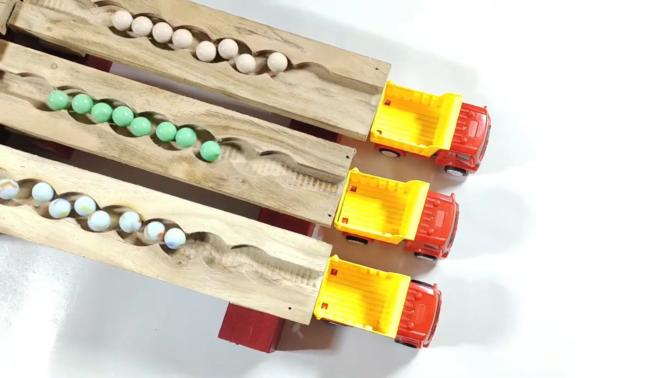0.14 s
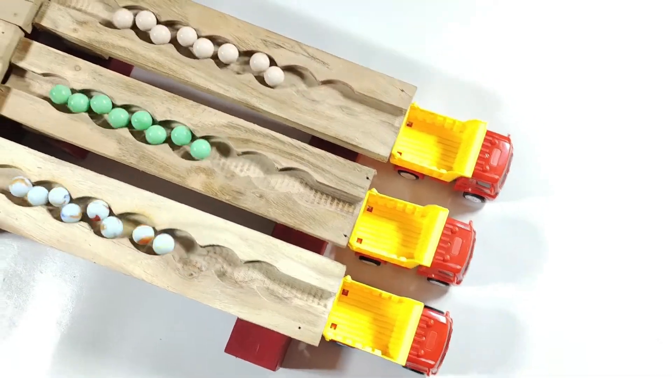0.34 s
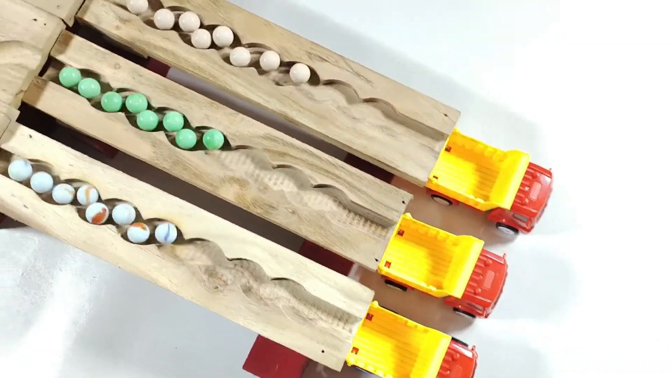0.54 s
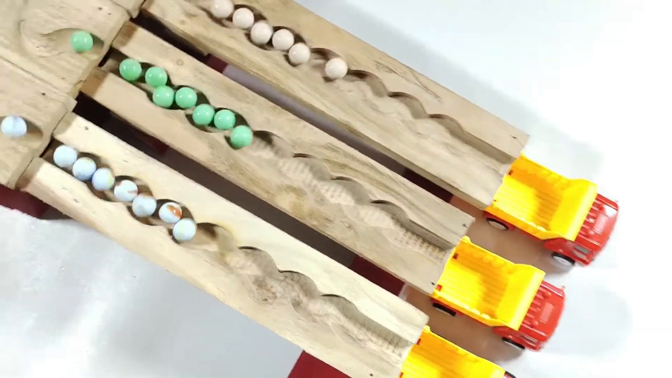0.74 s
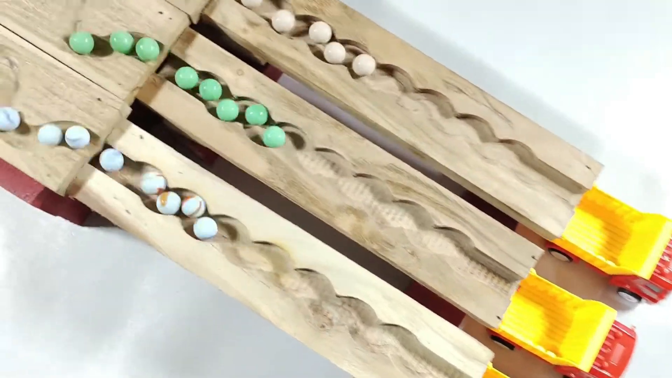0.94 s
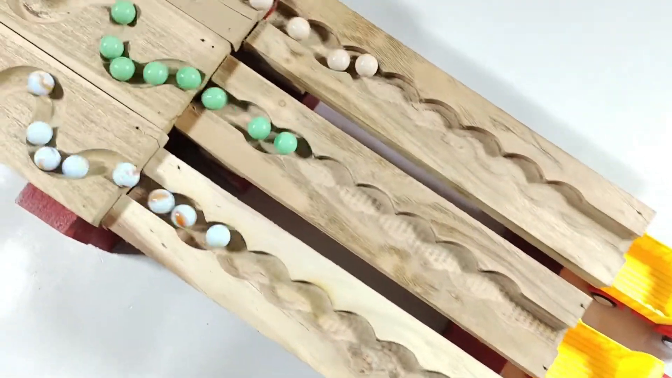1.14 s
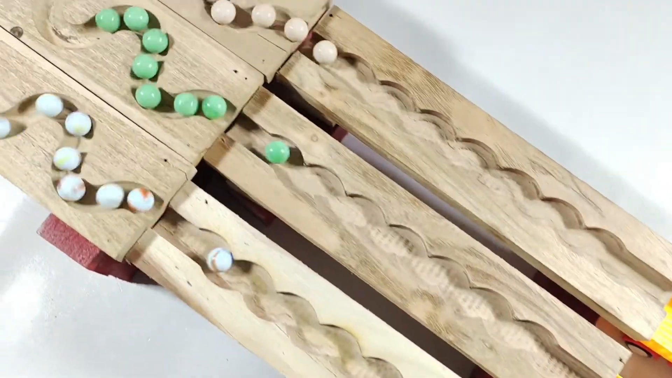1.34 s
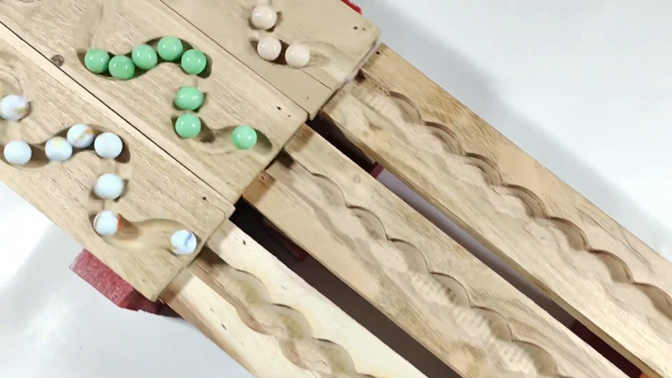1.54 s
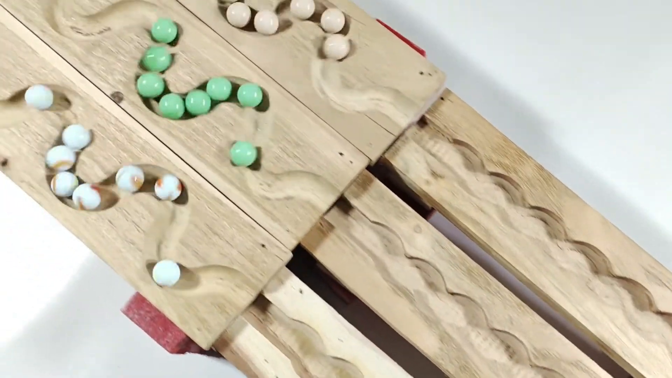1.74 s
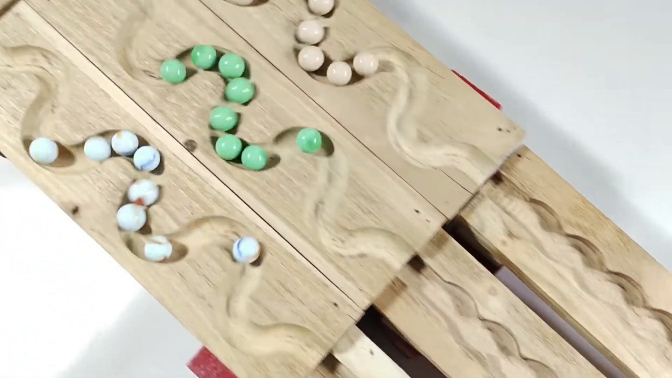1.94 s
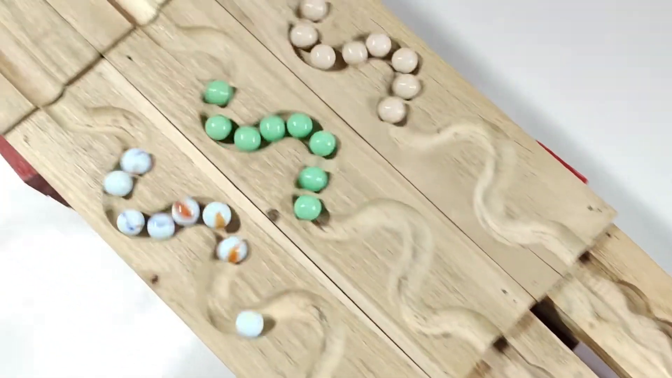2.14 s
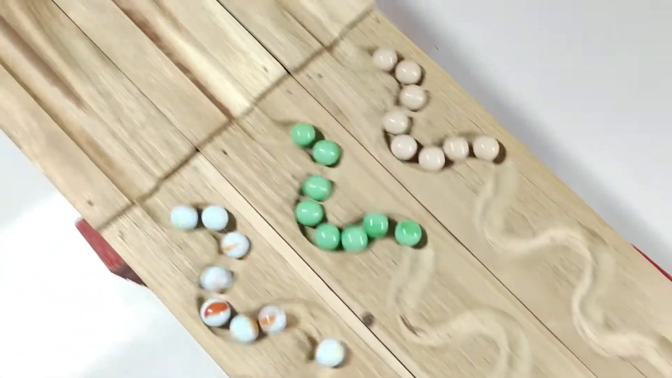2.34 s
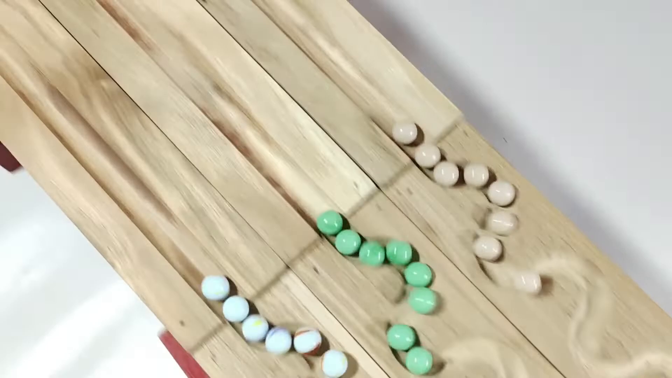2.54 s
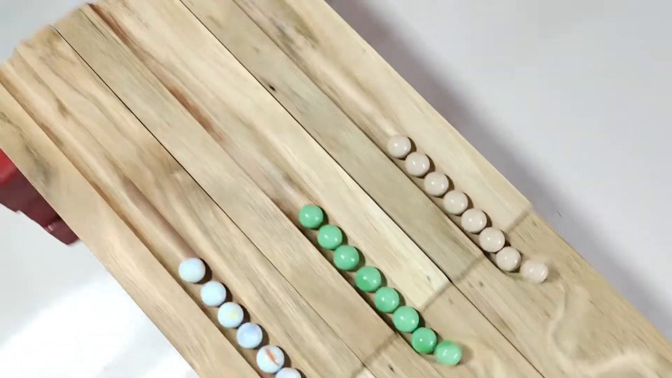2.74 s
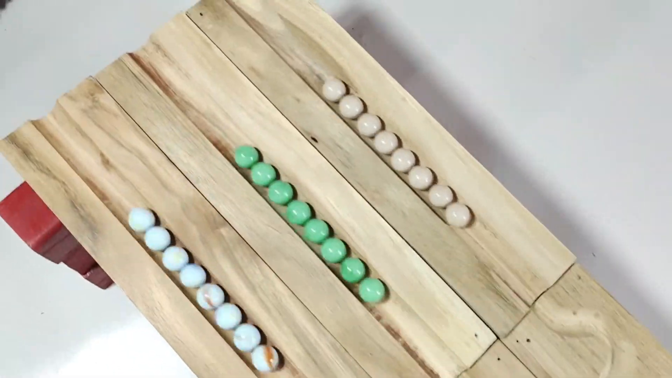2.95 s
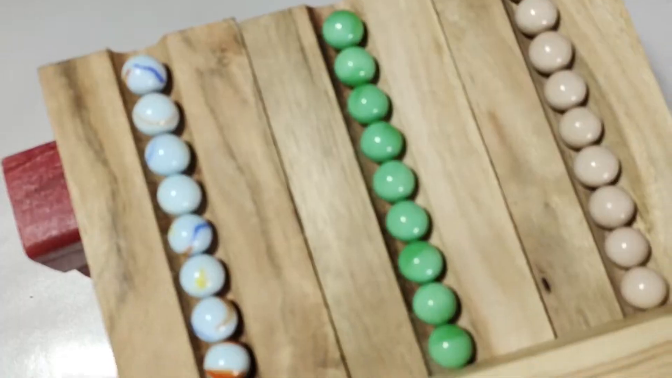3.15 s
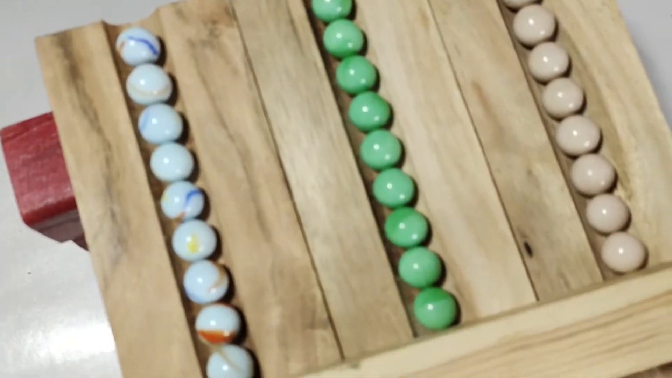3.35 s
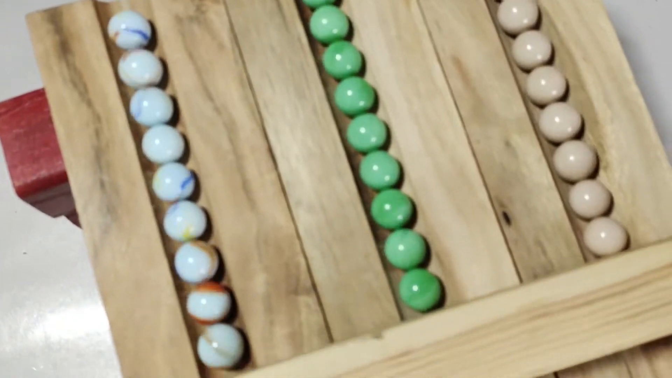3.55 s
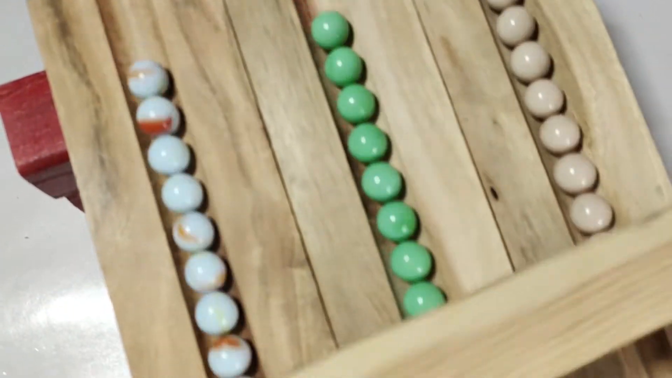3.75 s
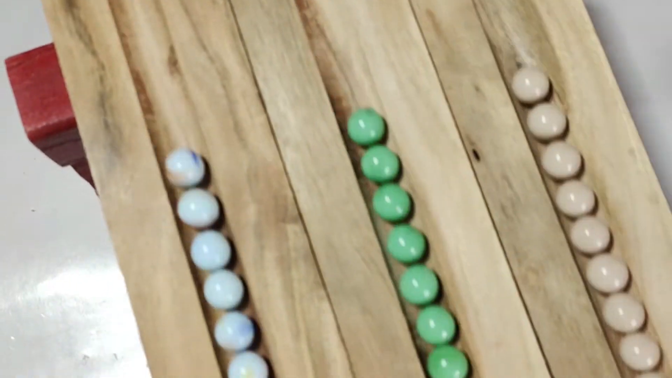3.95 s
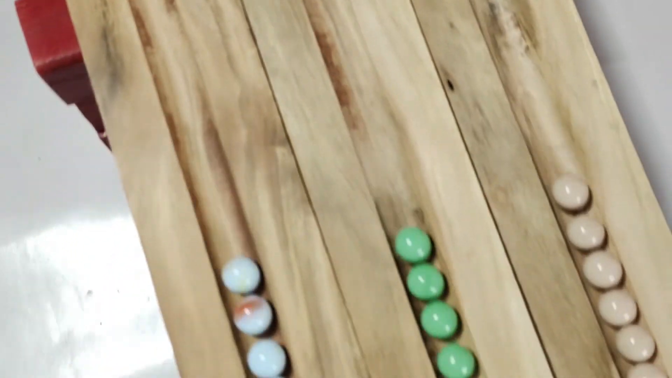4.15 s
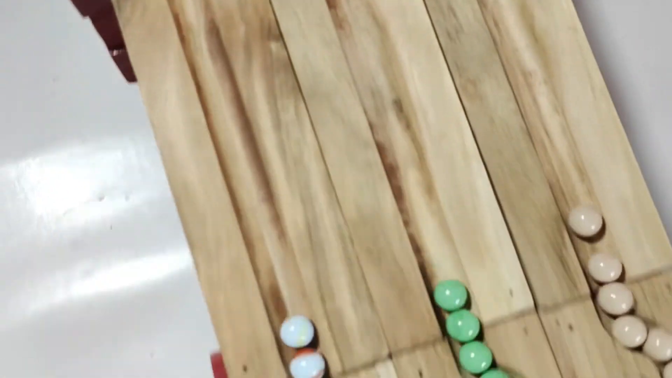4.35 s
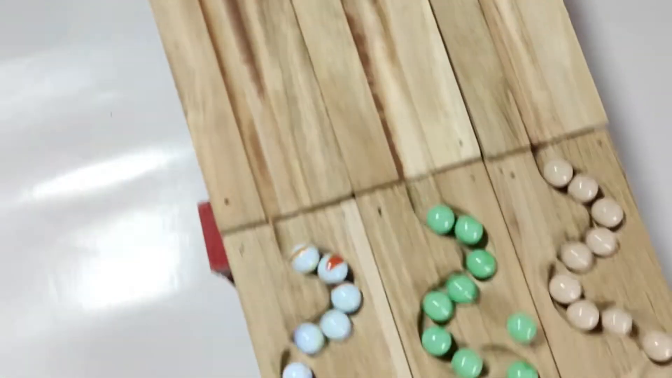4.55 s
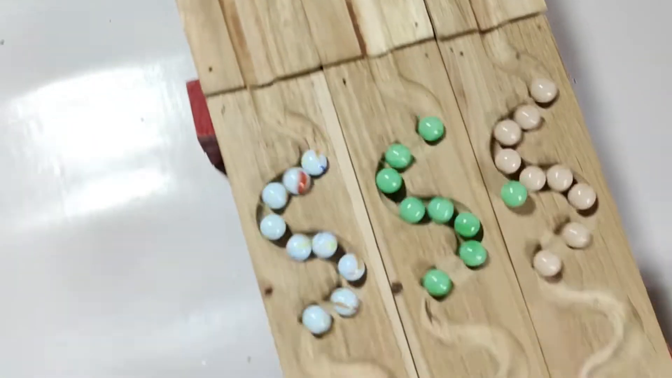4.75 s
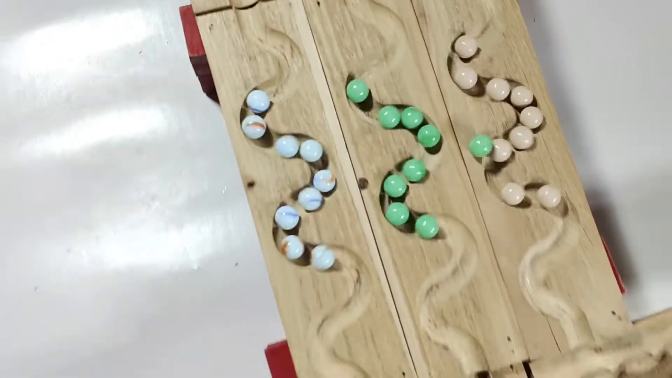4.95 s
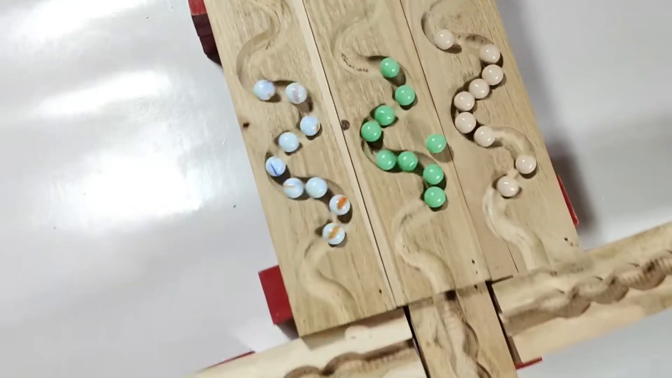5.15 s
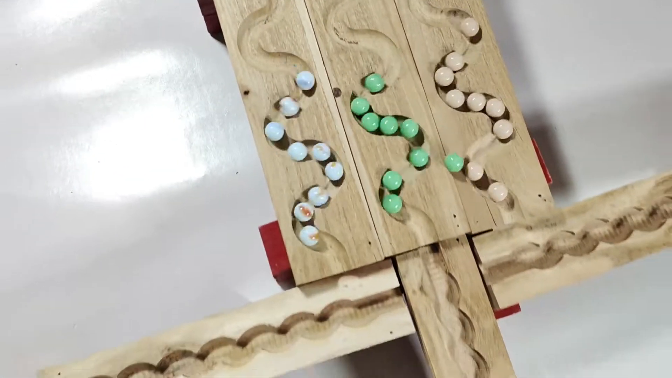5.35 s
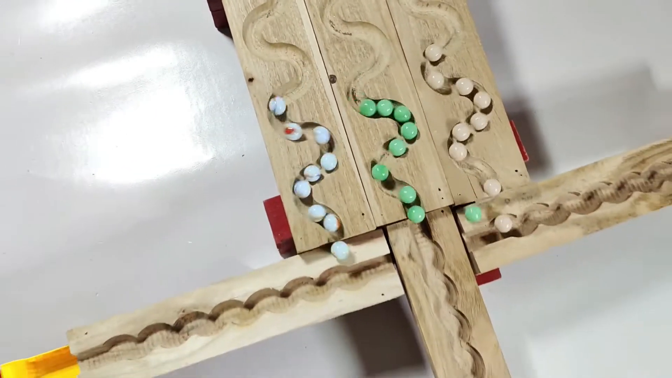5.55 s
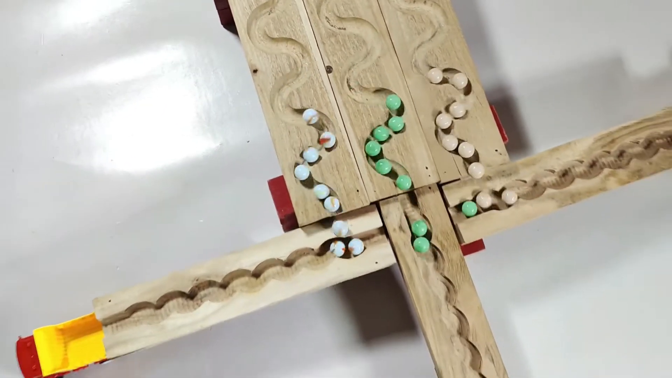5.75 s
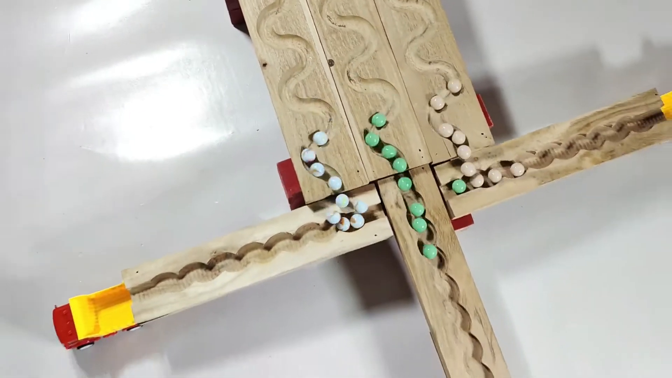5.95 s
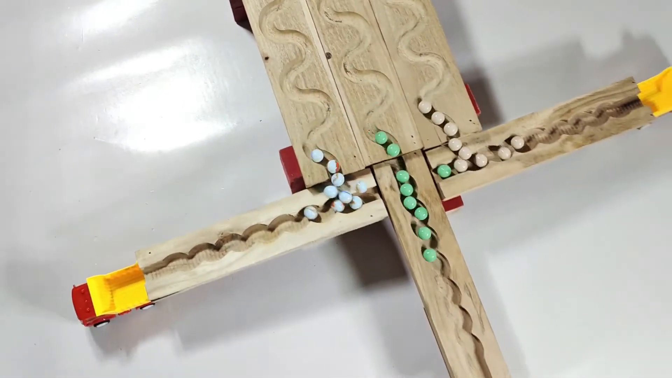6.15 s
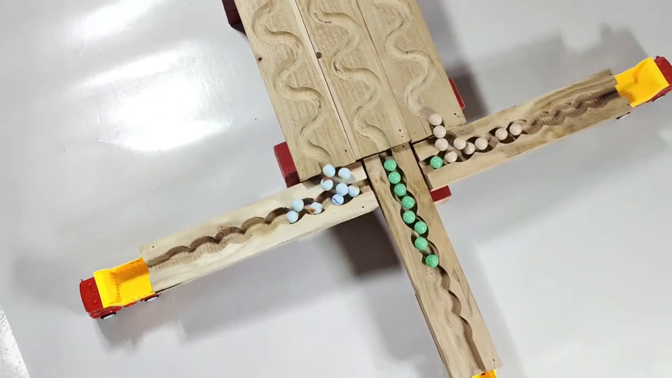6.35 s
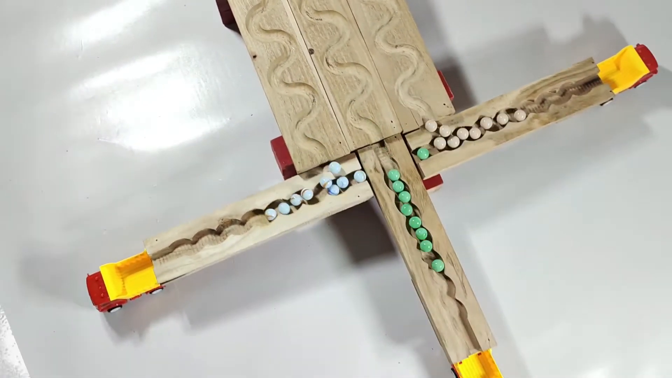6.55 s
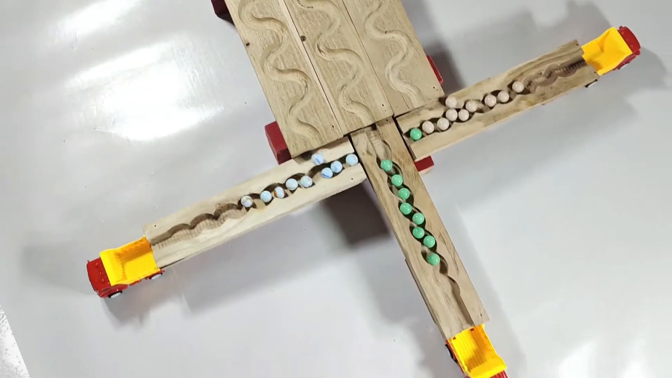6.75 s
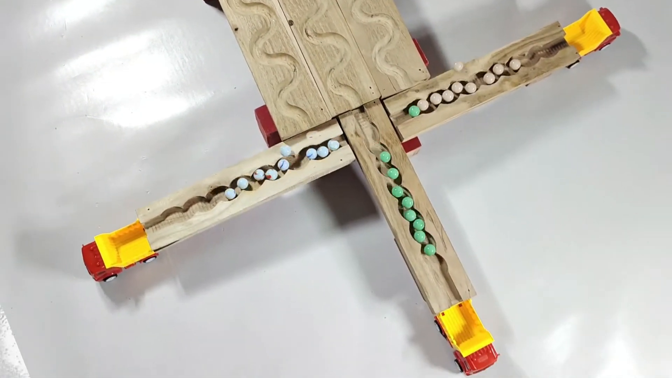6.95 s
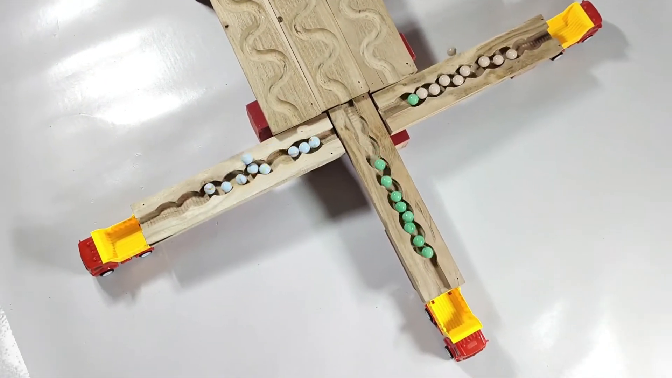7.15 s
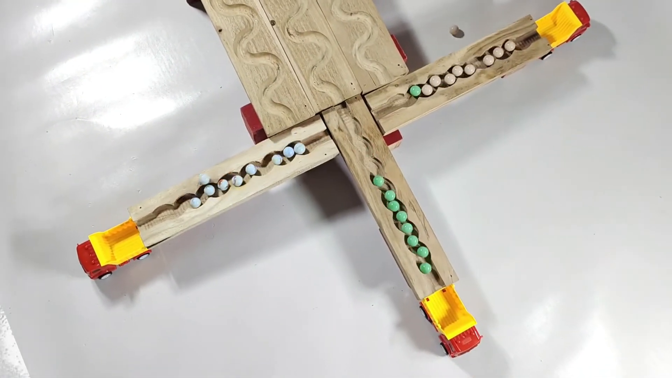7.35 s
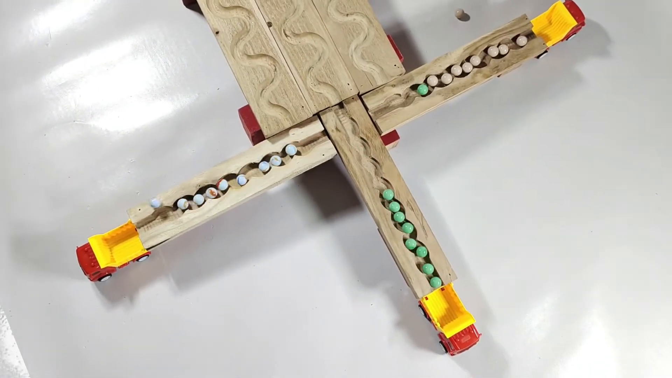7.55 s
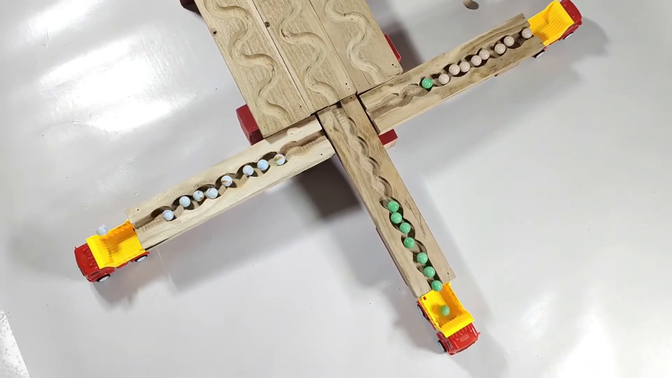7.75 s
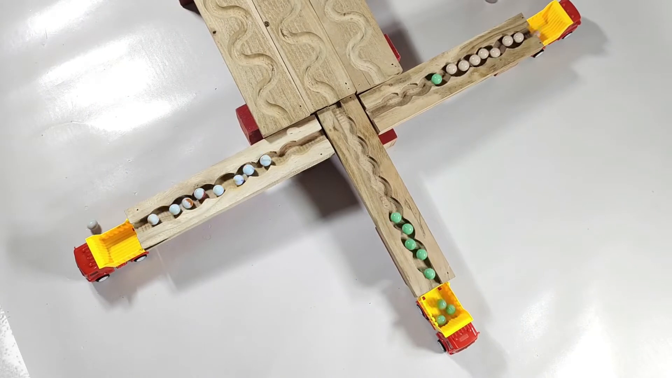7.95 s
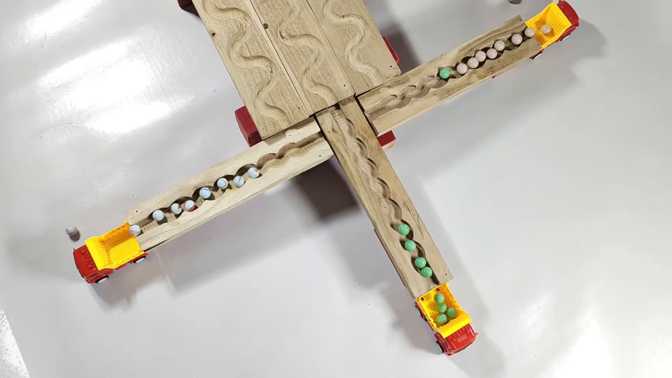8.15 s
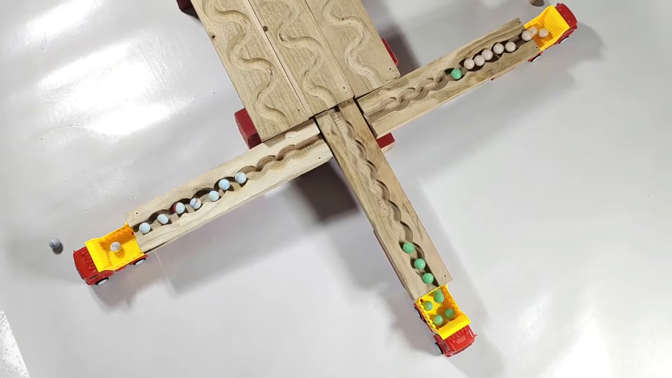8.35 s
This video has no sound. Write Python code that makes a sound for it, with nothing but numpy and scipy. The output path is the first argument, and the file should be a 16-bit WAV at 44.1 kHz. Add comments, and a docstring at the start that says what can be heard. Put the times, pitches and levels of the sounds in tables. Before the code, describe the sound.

Close, dry sound of many small glass balls on grooved wood. Reversed rattling, with echoes rising before each knock, moves from sparse ticks to dense clacking and a swelling hollow rush, then quiet. A forward roll grows, clatters loudly across a hollow board, chatters more evenly, knocks down wavy channels, fades to faint ticks, and ends with hard plastic cracks over faint room hiss.

```python
"""Marble trains on a wooden run

Trains of glass marbles roll down a wooden ramp, clatter over a zigzag board, knock along wavy chutes and drop
into plastic toy trucks in a small room. The opening seconds run backwards: knocks swell and stop dead as the
marbles climb to the top. After a quiet moment the scene changes and marbles run forwards. Random grains and
timed blows excite ringing modes of wood, glass and plastic; squeaks are narrow whistles and the room tone is
shaped noise."""
import sys
import numpy as np
from scipy import signal
from scipy.fft import rfft, irfft
from scipy.io import wavfile
from scipy.ndimage import uniform_filter1d

SR = 44100
rng = np.random.default_rng(int(sys.argv[2]) if len(sys.argv) > 2 else 0)


def persist_wave(psi):
    """Save psi, clipped to +-1, as 16-bit WAV."""
    counts = np.round(np.clip(psi, -1, 1) * 32767).astype(np.int16)
    wavfile.write(sys.argv[1], SR, np.atleast_2d(counts).T)


N = 374409
T = np.arange(N) / SR   # time in s
TURN_S = 3.4   # time runs backwards before this, forwards after

# level_db columns are relative; most sources trim them further.
# knocks on the bends of the chutes, and at 7.28 s a marble landing beside the track: start_s, level_db
CHUTE_KNOCKS = [(.6266, -29), (.6657, -21), (.685, -18.5), (.7356, -21.5), (.8106, -18.5), (.8285, -21),
                (.8468, -27), (.896, -18.5), (.9151, -17.5), (.9304, -19.5), (.9893, -20.5), (1.0148, -23),
                (1.0452, -21.5), (1.1095, -22.5), (1.1335, -18), (1.1895, -19.5), (1.2176, -21.5),
                (1.2411, -19.5), (1.292, -21.5), (1.3054, -24), (1.3388, -19), (1.4128, -22.5),
                (1.4631, -18.5), (1.5057, -21.5), (5.653, -31.5), (5.7076, -24), (5.7249, -17.5),
                (5.7564, -23), (5.7733, -25.5), (5.8045, -19.5), (5.8329, -20.5), (5.8678, -24.5),
                (5.881, -23), (5.9098, -20), (5.9432, -27), (5.9895, -27), (6.0586, -25.5), (6.0859, -24.5),
                (6.1019, -26.5), (6.1667, -22.5), (6.2045, -24.5), (6.26, -24.5), (6.3805, -24),
                (6.399, -21.5), (6.4595, -23.5), (6.4753, -25), (6.5521, -25), (6.6128, -31.5),
                (6.6478, -30), (6.7268, -21.5), (6.765, -29), (6.785, -30.5), (6.8057, -34),
                (6.8538, -30.5), (6.9088, -37.5), (7.2795, -35)]
# hardest knocks on the bends of the board: start_s, level_db
BOARD_KNOCKS = [(1.937, -34), (2.4354, -21.5), (2.4855, -25.5), (2.53, -20), (2.5833, -26), (2.6091, -22),
                (2.6647, -20), (2.71, -22), (2.7644, -26), (2.776, -24), (4.2687, -18), (4.2806, -28),
                (4.2951, -16), (4.3195, -18), (4.3509, -19.5), (4.3705, -21), (4.3895, -17.5),
                (4.404, -19.5), (4.5019, -17.5), (4.539, -22), (4.5803, -16.5), (4.605, -37), (4.6238, -21),
                (5.0855, -26)]
# clear clicks of glass on glass: start_s, level_db
GLASS_CLICKS = [(.2193, -37.5), (.2801, -39.5), (.5454, -42), (1.0973, -28), (1.1574, -29.5), (1.4224, -32),
                (1.6635, -33.5), (1.6833, -32.5), (1.8372, -33.5), (1.8877, -39.5), (2.085, -36.5),
                (2.159, -37), (2.2017, -31.5), (2.266, -39.5), (2.3369, -28.5), (2.4027, -25.5),
                (2.48, -23.5), (2.5833, -22.5), (2.6411, -22), (2.7529, -28), (2.7644, -29.5),
                (4.3284, -23.5), (4.3751, -28.5), (4.4372, -20), (4.5803, -24.5), (4.832, -33),
                (4.8763, -33.5), (5.0527, -24.5), (5.0732, -29.5), (5.3138, -32), (5.3409, -22.5),
                (5.3694, -25.5), (5.6441, -36), (5.9257, -22.5), (6.0733, -23), (6.1133, -24.5),
                (6.6367, -31), (6.9481, -42), (6.9775, -40.5), (7.0783, -39.5), (7.38, -50), (7.49, -53),
                (7.605, -50.5), (7.6625, -47.5)]
# marbles dropping off the chutes into the trucks and bouncing, and at 7.283 s one landing beside the track:
# start_s, level_db
TRUCK_DROPS = [(7.283, -30), (7.852, -12), (7.8745, -18), (7.9029, -20), (7.9551, -27.5), (8.0107, -13.5),
               (8.0544, -26.5), (8.098, -22.5), (8.1003, -11), (8.1495, -22.5), (8.1632, -25.5),
               (8.261, -33), (8.3134, -17), (8.3377, -17), (8.4103, -14), (8.4216, -12), (8.4802, -23)]
# dull bumps heard through the microphone housing: start_s, level_db
HOUSING_BUMPS = [(5.914, -30), (5.922, -23.5), (5.940, -27.5), (6.023, -29), (6.032, -31), (6.047, -31)]
# thin squeaks of glass rubbing on glass: centre_s, pitch_hz, level_db, half_length_s
GLASS_SQUEAKS = [(2.869, 10360, -43.5, 0.013), (2.822, 11080, -51, 0.061), (2.839, 13100, -53, 0.045),
                 (2.967, 10900, -55.5, 0.033), (2.969, 13120, -57.5, 0.039), (3.732, 11100, -58, 0.0073),
                 (4.114, 11000, -59.5, 0.029)]

# resonances of the grooved ramp: pitch_hz, width_hz, level_db
RAMP_MODES = [(424, 44, -6.5), (495, 78, -3), (825, 364, -5), (1164, 120, -12.5), (1546, 160, -6.5),
              (1863, 94, 3.5), (2034, 130, -1), (2440, 660, -13.5), (3770, 86, -14), (5100, 710, -46),
              (7770, 910, -34)]
# resonances of the hollow zigzag board: pitch_hz, width_hz, level_db
BOARD_MODES = [(390.2, 52, -1.5), (500.7, 100, 2), (592.6, 134, 3.5), (813.6, 330, -3.5), (1099, 230, -6.5),
               (1519.8, 122, 1), (1597, 81, 3.5), (1850, 270, -8.5), (2380, 750, -14), (2900.6, 132, -7.5),
               (3678, 200, -21.5), (4474, 240, -28.5)]
# resonances of the wavy chutes: pitch_hz, width_hz, level_db
CHUTE_MODES = [(507, 120, -28.5), (885, 121, -4), (1277, 270, -8.5), (1653, 110, -8), (2059, 57, 7),
               (2295, 260, -5), (2870, 170, -2), (3681, 230, -6), (3793, 75, 1.5), (4380, 190, -14),
               (4940, 180, -18), (5650, 180, -11), (6470, 240, -20), (7020, 330, -10)]
# resonances of the booming plank: pitch_hz, width_hz, level_db
PLANK_MODES = [(781, 82, 4.5), (656, 198, -15.5), (1515, 99, -15.5), (5395, 100, -3.5)]
# resonances of the low ends of the chutes: pitch_hz, width_hz, level_db
CHUTE_END_MODES = [(850, 165, -7.5), (1180, 240, -10.5), (1657, 116, -5.5), (2120, 260, 0.5),
                   (2400, 104.6, 2.5), (2886, 113, -1.5), (3540, 180, -14), (3880, 194, -6)]
# resonances of marbles touching softly: pitch_hz, width_hz, level_db
GLASS_MODES = [(6620, 350, -6), (7085, 640, 3.5), (7930, 270, -3.5), (8680, 1300, -11.5)]
# resonances of the plastic truck beds: pitch_hz, width_hz, level_db
TRUCK_MODES = [(1350, 180, 0.5), (1660, 350, -6.5), (1875, 200, 0.5), (2230, 450, 3.5), (2600, 450, -2.5),
               (3580, 330, -12.5), (4360, 300, -12), (4900, 870, -14.5), (6600, 310, -4), (7050, 250, -4),
               (8100, 1600, -10.5), (11100, 3300, -14), (12750, 4500, -21)]
# broad resonances of the first crack of a chute knock: pitch_hz, width_hz, level_db
SNAP_MODES = [(1285, 1300, -14.5), (3580, 550, -1.5), (6650, 1100, 7.5)]
# low resonances of the microphone housing: pitch_hz, width_hz, level_db
HOUSING_MODES = [(94, 9.9, -4.5), (161.5, 16, -0.5), (206, 12, -5.5), (291, 36.4, -1)]
# bright resonances of hard glass contacts: pitch_hz, width_hz, level_db
CRACK_MODES = [(7570, 1200, -6), (7700, 2500, -16), (11600, 4000, -19.5), (4760, 1500, -15.5)]
# resonances of the table under the trucks: pitch_hz, width_hz, level_db
TABLE_MODES = [(256.7, 49, 5), (377, 260, -5.5)]
# spectrum of the room tone: pitch_hz, level_db (per Hz)
HUSH_SPECTRUM = [(24, -57.5), (40, -33.5), (59, -12), (111, -12), (145, -10.5), (291, -12.5), (454, -14.5),
                 (627, -18), (784, -23), (4560, -38), (7130, -32), (12300, -43.5), (15000, -34)]

# Each stretch of track is passed twice; in the backward run the trains leave at an earlier time than they arrive.
# gathering speed on the straight ramp: arrive_s, start_to_leave_s, build_up_s, drain_s, level_db
ON_RAMP = [(3.114, 2.85, 0.00626, 0.13, -33), (3.685, 4.27, 0.12, 0.091, -34.5)]
# rushing into the zigzags with the speed of the ramp: arrive_s, start_to_leave_s, build_up_s, drain_s, level_db
RUSHING = [(2.88, 2.593, 0.064, 0.23, -33.5), (4.25, 4.468, 0.036, 0.27, -33.5)]
# winding down the board at an even pace: arrive_s, start_to_leave_s, build_up_s, drain_s, level_db
ON_BOARD = [(2.86, 1.3, 0.044, .8, -44), (4.25, 5.84, 0.063, 0.857, -43.5)]
# swinging down the wavy chutes: arrive_s, start_to_leave_s, build_up_s, drain_s, level_db
IN_CHUTES = [(1.525, .85, 0.0061, .3, -41), (5.62, 6.76, 0.068, 0.23, -39)]
# creeping along the low ends of the chutes: arrive_s, start_to_leave_s, build_up_s, drain_s, level_db
AT_ENDS = [(.58, 0, 0.032, .1, -53), (6.92, 9, .06, .2, -54.5)]
# crowding from the board into the chutes: arrive_s, start_to_leave_s, build_up_s, drain_s, level_db
CROWDED = [(1.0, 0.69, 0.012, .22, -49), (5.88, 6.62, 0.016, 0.26, -45)]
# a slow marble leans into a bend: centre_s, level_db
SWINGS = [(.07, -62), (.135, -51), (.275, -49), (.44, -46), (7.06, -54), (7.2, -59), (7.4, -66),
          (7.5, -55.5), (7.61, -56), (7.8, -63)]
# a train bunches up and its marbles chatter: centre_s, level_db
BUNCHES = [(.11, -52), (.39, -45), (.58, -43), (.72, -39.5), (.83, -41), (1.44, -54.5), (1.62, -53),
           (1.81, -50.5), (2.13, -49.5), (2.69, -32.5), (4.41, -32.5), (4.62, -44.5), (4.74, -44.5),
           (5.1, -45), (5.35, -44.5), (6.39, -42.5), (6.78, -54)]
SWING_S, BUNCH_S = 0.018, 0.0603   # half lengths of the swells

# steady glass chatter relative to the rolling
RUSH_CHATTER_DB, BOARD_CHATTER_DB, CHUTE_CHATTER_DB, END_CHATTER_DB = -1.5, -13.5, -23.5, -15
KNOCK_CLICK_DB = -5.5   # in a tight train the glass rings along with each knock on the board
HUSH_DB = -75.5
ROOM_T60_S = 0.36
MIC_TOP_HZ, CUTOFF_HZ = 14700, 15800   # gentle roll-off, then steep cut


def from_db(db):
    """Decibels to amplitude."""
    return 10 ** (np.asarray(db) / 20)


def unit_energy(x):
    """Scale to energy 1."""
    return x / np.sqrt(np.sum(x ** 2) + 1e-20)


def rms_one(x):
    """Scale to rms 1."""
    return unit_energy(x) * np.sqrt(len(x))


def cut(x, hz, kind, order=2):
    """Butterworth low- or high-pass."""
    return signal.sosfilt(signal.butter(order, min(hz, .45 * SR), kind, fs=SR, output="sos"), x)


def blows(rows):
    """One force pulse for each start_s, level_db."""
    force = np.zeros(N)
    for start_s, level_db in rows:
        force[min(round(start_s * SR), N - 1)] += from_db(level_db)
    return force


def grains(per_s, spread_db):
    """Random small impacts of uneven size; rms 1."""
    sizes = from_db(spread_db * np.minimum(rng.exponential(1, N), 3))
    sizes = sizes * rng.choice([-1, 1], N)
    return rms_one(sizes * (rng.random(N) < per_s / SR))


def flutter(hz, depth_db):
    """Uneven contact pressure: a wandering gain of rms 1."""
    wander = rms_one(cut(rng.standard_normal(N), hz, "low"))
    return rms_one(from_db(depth_db * np.clip(wander, -2, 2)))


def passage(rows, trend_db_per_s):
    """Rolling builds up as the trains arrive, gains or loses with their speed, and drains as they leave."""
    gain = 0
    for arrive_s, leave_s, build_s, drain_s, level_db in rows:
        direction = np.sign(leave_s - arrive_s)   # -1 in the backward run
        age = np.maximum(direction * (T - arrive_s), 0)
        remaining = np.clip(1 - (age - abs(leave_s - arrive_s)) / drain_s, 0, 1)
        build_up = (1 - np.exp(-age / build_s)) ** 3
        gain = gain + from_db(level_db + trend_db_per_s * age) * remaining * build_up
    return gain


def swells(rows, half_s):
    """A bell-shaped rise and fall of gain for each centre_s, level_db."""
    return sum(from_db(level_db) * np.exp(-((T - centre_s) / half_s) ** 2) for centre_s, level_db in rows)


def tail(t60):
    """Dense reflections dying away; energy 1."""
    t = T[:int(t60 * SR)]
    return unit_energy(rng.standard_normal(len(t)) * from_db(-60 * t / t60))


def respond(x, response):
    """Ringing follows its cause after the turn and comes before it while time runs backwards."""
    turn = int(TURN_S * SR)
    backwards = signal.oaconvolve(x[:turn][::-1], response)[:turn][::-1]
    forwards = signal.oaconvolve(x[turn:], response)[:N - turn]
    return np.concatenate([backwards, forwards])


def body(force, modes, low_hz, scatter_db, scatter_t60, detune=0.0137, order=1, count=6):
    """Impacts land on several spots, each with its own mode tuning, weights and scatter through the structure.
    Order 1 rings at once, as from a blow; order 2 builds up softly and leaves deep valleys between the modes."""
    hz, width, db = np.transpose(modes)[:, :, None]
    t = T[:int(2 * SR / width.min())]
    age = np.pi * width * t * np.sqrt(order)
    fading = from_db(db) * width * age ** (order - 1) * np.exp(-age)
    spot = rng.integers(0, count, N)
    out = 0
    for k in range(count):
        tuned_hz = hz * (1 + detune * rng.standard_normal(hz.shape))
        rings = fading * np.sin(2 * np.pi * tuned_hz * t)
        weights = from_db(rng.normal(0, 1.63, len(modes))) * rng.choice([-1, 1], len(modes))
        scatter = from_db(scatter_db) * tail(scatter_t60)
        scatter[0] += 1   # direct sound
        response = cut(signal.fftconvolve(weights @ rings, scatter), low_hz, "high", order=6)
        out = out + respond(force * (spot == k), unit_energy(response))
    return out


def hush():
    """Faint steady room tone: noise coloured by a smooth spectrum."""
    hz, db = np.transpose(HUSH_SPECTRUM)
    bins_hz = np.fft.rfftfreq(N, 1 / SR)
    colour = from_db(np.interp(np.log(bins_hz + 1), np.log(hz), db))
    return from_db(HUSH_DB) * rms_one(irfft(rfft(rng.standard_normal(N)) * colour, N))


def room(x):
    """A short reverberation, duller than the direct sound."""
    reflections = np.pad(tail(ROOM_T60_S), (int(.004 * SR), 0))   # 4 ms pre-delay
    return respond(x, cut(reflections, 9000, "low", order=1))


def chute_ends(gain):
    """Slow marbles touch the walls fitfully and ring the wood lightly, thinner in the more distant forward run."""
    force = from_db(0.5) * gain * flutter(hz=34.3, depth_db=4.0) * grains(per_s=500, spread_db=3.5)
    ringing = body(force, CHUTE_END_MODES, low_hz=724, scatter_db=-5, scatter_t60=0.039, detune=0.011, order=2)
    return np.where(T < TURN_S, ringing, cut(ringing, 1290, "high", order=4))


def glass(gain):
    """Soft pings between marbles, denser as the trains crowd together; harder contacts add a bright crack."""
    crowding = gain / gain.max()
    ticks = grains(per_s=110 + 700 * crowding, spread_db=5.5)
    # even out the level, so that density does not set loudness
    ticks = from_db(-1.5) * gain * ticks / np.sqrt(uniform_filter1d(ticks ** 2, size=5000) + 0.071)
    along = from_db(KNOCK_CLICK_DB) * crowding ** .5 * blows(BOARD_KNOCKS)
    struck = from_db(17.5) * (blows(GLASS_CLICKS) + along)
    pings = body(ticks + from_db(1.0) * struck, GLASS_MODES, low_hz=5539,
                 scatter_db=-1.0, scatter_t60=0.031, detune=0.017, order=2)
    hard = from_db(-3.0) * ticks * crowding ** 0.27 + from_db(-6.5) * struck
    return pings + body(hard, CRACK_MODES, low_hz=3480, scatter_db=2.5, scatter_t60=0.029)


def jostle():
    """Dense, very bright ticks where the trains bunch up."""
    force = passage(CROWDED, trend_db_per_s=-6) * grains(per_s=380, spread_db=4.5)
    return body(force, CRACK_MODES, low_hz=8400, scatter_db=9.0, scatter_t60=0.032, count=3)


def board(gain):
    """A hollow rumble in the zigzags; fast marbles hop and hit harder, which brightens it."""
    rolling = from_db(3.0) * gain * flutter(hz=13.4, depth_db=1.34) * grains(per_s=2200, spread_db=6.0)
    rumble = body(rolling, BOARD_MODES, low_hz=316.3, scatter_db=-5.0, scatter_t60=0.029, order=2)
    hops = from_db(2.0) * gain * (gain / gain.max()) ** 2.43 * grains(per_s=600, spread_db=3.0)
    # hard hits tilt the modes up by 14.8 dB per octave
    hard = [(hz, width, db + 14.8 * np.log2(hz / 1000)) for hz, width, db in BOARD_MODES]
    knocks = body(hops + from_db(21.5) * blows(BOARD_KNOCKS), hard, low_hz=267.0,
                  scatter_db=6.5, scatter_t60=0.082, count=8)
    low_rumble = from_db(-14.5) * cut(gain * rng.standard_normal(N), 380, "low")
    return rumble + knocks + low_rumble


def chutes(gain):
    """Marbles swing from wall to wall and knock; in the backward run a plank booms close by."""
    rolling = from_db(4.0) * gain * grains(per_s=500, spread_db=9.0)
    knocks = from_db(22.5) * blows(CHUTE_KNOCKS) + from_db(-6) * gain * grains(per_s=29, spread_db=2.0)
    rumble = body(rolling, CHUTE_MODES, low_hz=410, scatter_db=-5, scatter_t60=0.038, order=2)
    clacks = body(knocks, CHUTE_MODES, low_hz=420, scatter_db=2, scatter_t60=.024, detune=.03, count=12)
    # strong scatter smears the first crack as it runs along the plank
    snap = body(from_db(-10) * knocks, SNAP_MODES, low_hz=600, scatter_db=18, scatter_t60=.018)
    snap = from_db(4.0) * cut(snap, 7640, "low", order=6)
    plank_force = (rolling + from_db(-4.0) * knocks) * (T < TURN_S)
    plank = body(plank_force, PLANK_MODES, low_hz=400, scatter_db=-9.5, scatter_t60=0.041, detune=0.012, order=2)
    return rumble + clacks + snap + from_db(-3.5) * plank


def squeaks():
    """Brief narrow whistles that swell and fade, wavering in level as glass rubs on glass."""
    waver = rms_one(cut(rng.standard_normal(N), 110, "low"))
    out = np.zeros(N)
    for centre_s, hz, level_db, half_s in GLASS_SQUEAKS:
        near = abs(T - centre_s) < 3 * half_s
        swell = from_db(level_db) * np.exp(-((T[near] - centre_s) / half_s) ** 2)
        out[near] += swell * np.sin(2 * np.pi * hz * T[near])
    return out * waver


def ramp(gain):
    """Rolling over the grain of straight grooves; speed opens the upper modes and adds gritty little skips."""
    speed = (gain / gain.max()) ** 0.42
    force = from_db(-3.5) * gain * flutter(hz=45, depth_db=0.8) * grains(per_s=1800, spread_db=2.5)
    roll = body(force, RAMP_MODES, low_hz=322, scatter_db=-3.5, scatter_t60=0.03, order=2)
    roll = speed * roll + (1 - speed) * cut(roll, 1300, "low", order=2)
    skips = from_db(-13.5) * gain * speed ** 3.1 * grains(per_s=310, spread_db=5.5)
    grit = body(skips, CHUTE_MODES, low_hz=2910, scatter_db=-5, scatter_t60=0.0341, count=4)
    return roll + cut(grit, 6050, "low", order=6)


def bumps():
    """Low thuds that reach the microphone through its housing."""
    force = from_db(23.0) * blows(HOUSING_BUMPS)
    return body(force, HOUSING_MODES, low_hz=85, scatter_db=-6, scatter_t60=0.26, count=2)


def trucks():
    """Hard cracks of glass on thin plastic, with a faint thud from the table under the wheels."""
    force = blows(TRUCK_DROPS)
    bed = body(from_db(23.0) * force, TRUCK_MODES, low_hz=1080,
               scatter_db=4.5, scatter_t60=0.046, detune=0.025, count=14)
    thud = body(from_db(-22.0) * force, TABLE_MODES, low_hz=150, scatter_db=-8, scatter_t60=.2, order=2, count=2)
    return bed + thud


def scene():
    """How much rolling there is on each stretch drives both its wood and the chatter of the glass."""
    on_ramp = passage(ON_RAMP, trend_db_per_s=12.5)
    rushing = passage(RUSHING, trend_db_per_s=-6.5)
    on_board = passage(ON_BOARD, trend_db_per_s=-0.72)
    in_chutes = passage(IN_CHUTES, trend_db_per_s=-1.5)
    at_ends = passage(AT_ENDS, trend_db_per_s=.5) + swells(SWINGS, SWING_S)

    chatter = swells(BUNCHES, BUNCH_S)
    chatter = chatter + from_db(RUSH_CHATTER_DB) * rushing + from_db(BOARD_CHATTER_DB) * on_board
    chatter = chatter + from_db(CHUTE_CHATTER_DB) * in_chutes + from_db(END_CHATTER_DB) * at_ends

    wood = ramp(on_ramp) + board(rushing + on_board) + chutes(in_chutes) + chute_ends(at_ends)
    clicks = glass(chatter) + jostle() + squeaks()
    drops = trucks()
    wet = room(from_db(-8.5) * wood + from_db(-10.0) * clicks + from_db(-6.0) * drops)
    return (wood + clicks + drops + wet + bumps() + hush())[None]


def record(dry):
    """The microphone softens the highest treble; the top is cut steeply."""
    softened = cut(dry, MIC_TOP_HZ, "low", order=3)
    steep = signal.ellip(10, .3, 80, CUTOFF_HZ, fs=SR, output="sos")
    return signal.sosfilt(steep, softened)


dry = scene()
out = record(dry)
persist_wave(out)
```